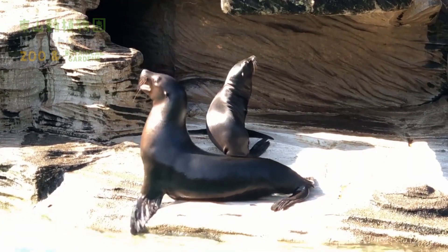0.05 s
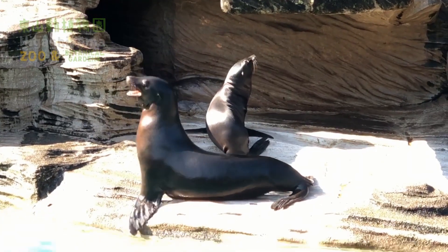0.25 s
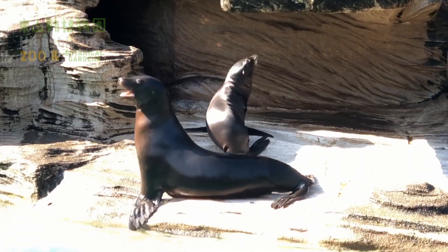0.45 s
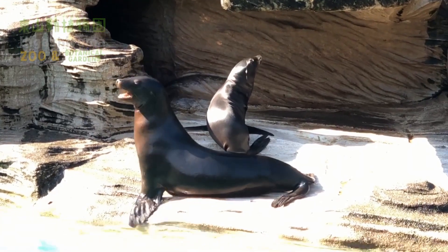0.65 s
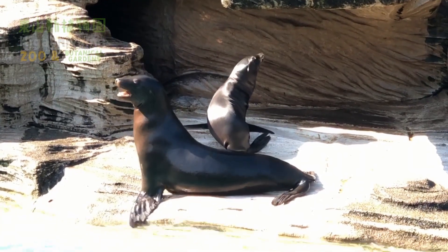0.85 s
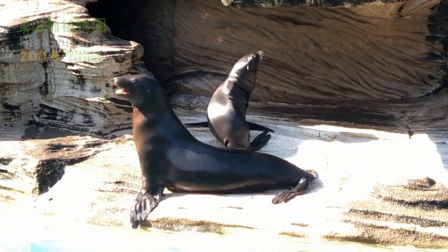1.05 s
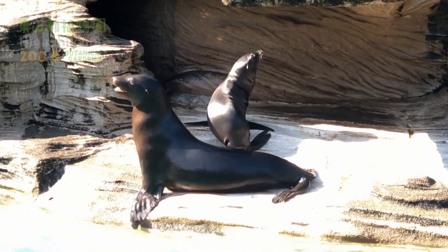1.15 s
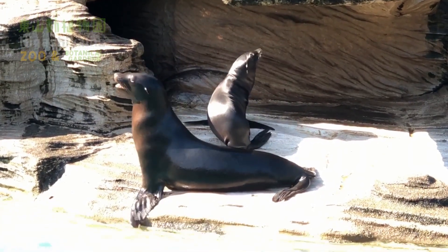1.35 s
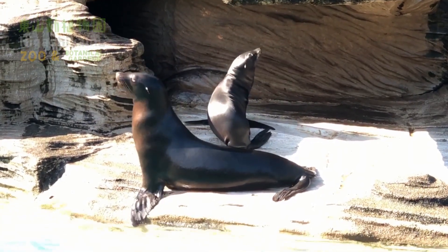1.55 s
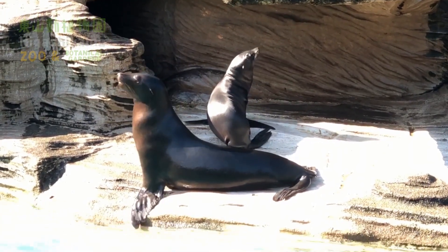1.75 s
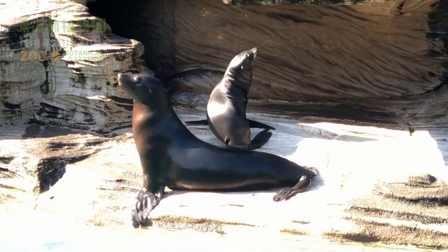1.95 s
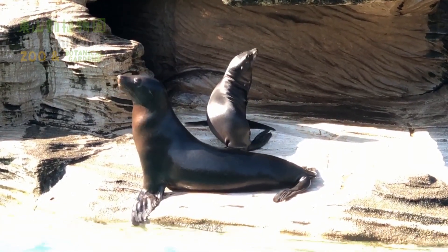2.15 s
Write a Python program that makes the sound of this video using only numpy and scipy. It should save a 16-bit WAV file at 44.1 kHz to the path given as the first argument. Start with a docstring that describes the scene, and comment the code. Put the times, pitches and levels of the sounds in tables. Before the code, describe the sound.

A sea lion gives four short honking barks, the later ones lower, weaker and hoarser, echoing briefly off rocks. Then pool water laps and plops faintly over a low rumble and soft hiss, heard from the water's edge.

```python
"""A sea lion barks on the rocks of its pool, almost centred before a stereo microphone at the water's edge.
We catch the end of one bark, then three more, each lower, weaker and hoarser. A bark is a honk from the
vocal folds (strong second and third harmonics) inside a rasp of air pulsed through the throat.
The rock wall behind rings on; water laps and plops over a low rumble and a soft hiss."""
import sys
import numpy as np
from scipy import signal
from scipy.fft import rfft, irfft
from scipy.io import wavfile
from scipy.ndimage import uniform_filter1d

SR = 44100
rng = np.random.default_rng(int(sys.argv[2]) if len(sys.argv) > 2 else 0)


def generate_wav(signal):
    """Clip the signal to [-1, 1] and save it as 16-bit WAV at the path in sys.argv[1]."""
    frames = np.transpose(np.atleast_2d(signal))
    scaled = np.clip(frames, -1, 1) * 32767
    pcm = np.round(scaled).astype(np.int16)
    wavfile.write(sys.argv[1], SR, pcm)


N = 97020
LEAD = SR // 5  # lead-in for the bark that is already sounding
T = np.arange(-LEAD, N) / SR
M = len(T)

# The course of each bark. Each row: time in seconds, pitch in Hz, then second harmonic,
# third harmonic, rasp and treble in relative dB.
FIRST_BARK = [(-.1, 445, -18, -50, -32, -44), (-.06, 500.4, -23, -40, -37, -52),
              (-.02, 495, -28, -43, -72, -44), (0.014, 499.5, -34.5, -58, -43.5, -49.5)]
SECOND_BARK = [(.228, 455, -57, -63, -45, -38.5), (.235, 449.8, -32.5, -58, -45, -35.5),
               (.245, 475, -22, -35, -23.5, -32.5), (0.252, 499.5, -44, -27.5, -32, -28),
               (0.264, 490.8, -27, -19.5, -29.5, -25), (0.289, 477.6, -17.5, -20, -33, -26),
               (0.326, 483.7, -19, -18.5, -44, -27.5), (0.346, 489.1, -17, -40, -32.5, -32.5),
               (0.357, 489.6, -25, -25, -39, -37), (0.366, 482.7, -58, -61, -30, -39)]
THIRD_BARK = [(0.644, 446.6, -43, -72, -36, -50), (0.65, 448.5, -40, -56, -40, -33.5),
              (.662, 471, -24, -32, -26.5, -30.5), (0.68, 450.2, -21, -39, -46.5, -36),
              (0.693, 446.9, -16, -30, -52, -34.5), (0.714, 445.5, -22.5, -35, -30, -36.5),
              (0.734, 464, -19.5, -44, -31, -37.5), (.746, 475.7, -28, -27, -40.5, -37),
              (0.757, 469.6, -24.5, -43, -36.5, -39.5), (.783, 459, -35.5, -65, -37, -48.5)]
LAST_BARK = [(1.081, 455.5, -55, -56, -46, -47), (1.096, 437.9, -24.5, -36, -41.5, -44),
             (1.107, 426, -24.5, -48, -35.5, -41), (1.121, 403.5, -35.5, -32.5, -39.5, -40.5),
             (1.148, 401.3, -36.5, -30, -34.5, -37.5), (1.162, 431.7, -18.5, -48, -46, -39.5),
             (1.179, 436.6, -24, -58, -34, -43.5), (1.189, 425.5, -73, -56, -36.5, -40),
             (1.198, 415, -25, -59, -41, -50), (1.21, 417.8, -36.5, -67, -42.5, -47)]
# The voice, bark by bark. Each row: jitter as a share of pitch, noisy share of the treble,
# fundamental offset in dB, rasp boost in dB, build-up of the top treble in seconds.
BARK_VOICES = [(0.0099, 0.44, -10, 9.5, .02), (0.0049, 0.47, -8, 3, 0.016), (0.0061, 0.66, -13, 3.5, 0.074),
               (0.0073, 1, -11, 6, 0.014)]
# Throat resonances. Each row: centre in Hz, width in Hz, gain in dB.
THROAT_RESONANCES = [(823, 78, 2.5), (919, 46, 5.5), (990, 180, -3), (1274, 160, -10), (1400, 72, -5.5),
                     (1600, 165, -15)]
# Treble colour as the mouth closes from bark to bark. Each row: frequency in Hz, gain in dB.
MOUTH_OPEN = [(1030, -58), (1750, -22), (1930, -9), (2080, -7), (2440, -13), (2550, -42), (2670, -16),
              (2770, -2.5), (2950, 1), (3110, -6.5), (3470, -11), (3590, -25), (3970, -8), (4830, -22.5),
              (5530, -18.5), (6620, -30), (7370, -22.5), (9480, -29.5), (11100, -29.5), (14600, -43),
              (15000, -61)]
MOUTH_HALF = [(1030, -41), (1750, -16), (1880, -22), (2040, 0.5), (2150, -1.5), (2270, -1.5), (2650, -13),
              (3110, 0), (3370, -10.5), (4220, -14), (4620, -22), (5430, -14), (5840, -17.5), (6220, -29),
              (6390, -20), (7990, -16.5), (9660, -21.5), (10900, -21), (15000, -40)]
MOUTH_NARROW = [(1030, -34), (1750, -2), (2060, -15), (2230, 2.5), (2310, 0.5), (2670, -9), (2770, -25),
                (3080, -3), (3560, -12.5), (3860, -11), (4880, -22), (5330, -12), (5580, -5.5), (6110, -25),
                (6680, -9), (7370, -26), (8440, -19), (9310, -24), (11100, -23.5), (12900, -36),
                (15000, -37)]
# Direct sound at the microphone. Each row: frequency in Hz, left minus right in dB.
MIC_BALANCE = [(500, -.2), (900, -.3), (1400, -.2), (2900, -1.5), (4500, -1), (8000, -.3)]
# Reflections off the rocks, nearest first. Each row: delay in seconds, gain in dB.
ROCK_ECHOES = [(.021, -21.5), (.043, -42), (.068, -17), (.125, -23), (.2, -28.5)]
# Ring of the enclosure. Each row: frequency in Hz, seconds to fall by 60 dB.
RING_DECAY = [(400, 1.08), (900, 1.14), (1500, 0.4), (3000, 2.4), (8000, 1.5), (15000, 5)]
# Colour of that ring. Each row: frequency in Hz, gain in dB.
RING_COLOUR = [(400, 8.5), (900, -1.5), (1500, -0.5), (3000, -3.5), (8000, 0.5), (15000, -2)]
# Plops in the pool. Each row: start in seconds, starting pitch in Hz, level in dB, length in seconds.
POOL_PLOPS = [(1.404, 430, -42.5, 0.013), (1.575, 271, -45, 0.074), (1.736, 563, -48.5, 0.026)]
# Small splashes. Each row: start in seconds, centre in Hz, level in dB, length in seconds.
POOL_SPLASHES = [(1.461, 1680, -48, 0.016), (1.483, 2770, -55.5, 0.02), (1.599, 620, -44.5, 0.014),
                 (1.604, 2250, -53, .016), (1.68, 3770, -57, 0.014), (1.937, 4700, -55.5, 0.05),
                 (2.046, 4760, -51.5, 0.033), (2.08, 1670, -42, 0.013), (2.161, 1600, -49.5, 0.011),
                 (2.157, 12000, -61.5, .05)]
# Strength of the lapping. Each row: time in seconds, level in dB.
LAPPING_LEVEL = [(0, -67), (.35, -50), (.55, -53.5), (1, -58), (1.38, -81), (1.48, -50.5), (1.8, -59),
                 (2, -67), (2.2, -70)]
# Background noise of the place. Each row: frequency in Hz, relative density in dB.
AMBIENCE_SPECTRUM = [(22, -22), (35, -20), (50, -6.5), (68, 4), (96, -7), (140, 0.5), (175, -4.5),
                     (290, -8), (360, -10), (560, -14.5), (800, -14), (1250, -18.5), (1750, -19),
                     (2300, -22), (5000, -23.5), (6400, -24), (8000, -31), (11000, -33.5), (15500, -38.5)]
# Swell of the background hiss. Each row: time in seconds, gain in dB.
HISS_SWELL = [(0, -2), (.2, -1), (.45, 4.5), (.65, 4.5), (1.05, 1.5), (1.35, -2), (1.6, -1), (2.2, 1.5)]


def sea_lion():
    """Four barks reach the microphone directly, then off the rocks, then as the ring of the wall."""
    courses = [FIRST_BARK, SECOND_BARK, THIRD_BARK, LAST_BARK]
    mouths = [(MOUTH_OPEN, 1), (MOUTH_OPEN, 1), (MOUTH_HALF, -1), (MOUTH_NARROW, -1)]
    barks = sum(bark(rows, voice, mouth, mouth_db)
                for rows, voice, (mouth, mouth_db) in zip(courses, BARK_VOICES, mouths))
    direct = np.array([shape(barks, MIC_BALANCE, share) for share in (.5, -.5)])
    echoes = sum(from_db(db) * np.interp(T - delay, T, barks, left=0) for delay, db in ROCK_ECHOES)
    return direct + echoes + wall_ring(barks)


def bark(rows, voice, mouth, mouth_db, attack_s=.0021, release_s=.029, closing_db_per_s=62):
    """Jittering vocal folds drive the honk, the rasp and the treble in step."""
    jitter, noisy, fundamental_offset_db, boost_db, build_s = voice
    times, *columns = np.transpose(rows)
    pitch, second_db, third_db, rasp_db, treble_db = [np.interp(T, times, c) for c in columns]
    start, end = times[0], times[-1]
    gate = np.exp(-np.maximum(start - T, 0) / attack_s - np.maximum(T - end, 0) / release_s)
    phase = 2 * np.pi * np.cumsum(pitch * (1 + jitter * drift(rate_hz=108))) / SR
    # The mouth closes through a bark and the low tone grows.
    closing_db = closing_db_per_s * (np.clip(T, start, end) - times.mean())
    fundamental_db = (second_db + rasp_db) / 2 + fundamental_offset_db + closing_db
    tone = honk(phase, [fundamental_db, second_db, third_db], jitter)
    rasp = from_db(rasp_db + boost_db) * throat_rasp(phase)
    treble = from_db(treble_db + mouth_db) * mouth_treble(phase, pitch, mouth, noisy, start, build_s)
    return gate * (tone + rasp + treble)


def honk(phase, levels_db, jitter, flutter_db_per_jitter=171):
    """The lowest harmonics of the folds, each fluttering in level on its own."""
    flutter_db = flutter_db_per_jitter * jitter
    return np.sqrt(2) * sum(from_db(db + flutter_db * drift(rate_hz=65)) * np.sin(k * phase)
                            for k, db in enumerate(levels_db, 1))


def throat_rasp(phase, band_hz=(670, 1900)):
    """Puffs of air ring the low resonances of the throat."""
    air = puffs(phase, depth=.89)
    rasp = sum((-1) ** k * from_db(db) * resonate(air, hz, width)
               for k, (hz, width, db) in enumerate(THROAT_RESONANCES))
    return even(bandpass(rasp, band_hz, order=6))


def mouth_treble(phase, pitch, mouth, noisy, start, build_s, flutter_db=1.17):
    """The mouth colours upper harmonics and pulsed breath; the very top builds up last."""
    overtones = sum(from_db(at_hz(mouth, k * pitch)) * np.cos(k * phase + 2 * np.pi * rng.random())
                    for k in range(4, 18))
    breath = shape(puffs(phase, depth=.61), mouth)
    treble = np.sqrt(1 - noisy) * rms_one(overtones) + np.sqrt(noisy) * rms_one(breath)
    held_back = highpass(treble, hz=3200) * np.clip(1 - (T - start) / build_s, 0, 1)
    return (treble - held_back) * from_db(flutter_db * drift(rate_hz=134))


def puffs(phase, depth):
    """Air noise let through once in each cycle of the folds."""
    return rng.standard_normal(M) * (1 + depth * np.cos(phase)) ** 2


def wall_ring(x, gain_db=-19, delay_s=.012):
    """Sound scattered by the rock wall behind the animal; each band dies at its own rate."""
    edges = np.geomspace(200, 16000, 11)
    age = np.arange(SR) / SR
    tail = np.zeros(SR)
    for low, high in zip(edges, edges[1:]):
        band = bandpass(rng.standard_normal(SR), [low, high], order=2)
        hz = np.sqrt(low * high)
        tail += band * from_db(at_hz(RING_COLOUR, hz) - 60 * age / at_hz(RING_DECAY, hz))
    tail *= np.clip(age / delay_s - 1, 0, 1)
    return from_db(gain_db) * signal.fftconvolve(x, tail / np.linalg.norm(tail))[:M]


def plops(rise_octaves=.178):
    """Water plops in the pool: short tones that rise in pitch."""
    out = np.zeros(M)
    for start, hz, db, length in POOL_PLOPS:
        pitch = hz * 2 ** (rise_octaves * np.clip((T - start) / length, 0, 1))
        out += from_db(db) * swell(start, length) * np.sin(2 * np.pi * np.cumsum(pitch) / SR)
    return out


def splashes(width_share=.21):
    """Small splashes on the surface: each a burst of narrow-band noise."""
    out = np.zeros(M)
    for start, hz, db, length in POOL_SPLASHES:
        spray = even(resonate(rng.standard_normal(M), hz, width_share * hz))
        out += from_db(db) * swell(start, length) * spray
    return out


def lapping(drops_per_s=400, spread_db=3):
    """Water laps in a fine patter of drops, each ringing at one of twenty pitches."""
    hits = rng.random(M) < drops_per_s / SR
    strength = from_db(spread_db * np.minimum(rng.exponential(1, M), 4))
    drops = hits * strength * rng.choice([-1, 1], M)
    pitches = np.geomspace(700, 6000, 20)
    pitch_index = rng.integers(0, len(pitches), M)
    patter = sum(resonate(drops * (pitch_index == k), hz, hz / 10) / hz for k, hz in enumerate(pitches))
    return gain_curve(LAPPING_LEVEL) * rms_one(patter)


def ambience(base_db=-47.5):
    """The bed of the place: low rumble under a slowly swelling hiss."""
    noise = from_db(base_db) * rms_one(shape(rng.standard_normal(M), AMBIENCE_SPECTRUM))
    hiss = highpass(noise, hz=4700)
    return noise - hiss + hiss * gain_curve(HISS_SWELL)


def drone(hz, db, width_hz=8.2):
    """A faint low tone in the background, wavering in level and phase."""
    phase = 2 * np.pi * hz * T
    return from_db(db) * (drift(width_hz) * np.sin(phase) + drift(width_hz) * np.cos(phase))


def from_db(db):
    """Decibels to gain."""
    return 10 ** (np.asarray(db) / 20)


def rms_one(x):
    """Scale to unit rms."""
    return x / np.sqrt(np.mean(x ** 2) + 1e-20)


def gain_curve(points):
    """Gain over time from rows of seconds and dB."""
    return from_db(np.interp(T, *np.transpose(points)))


def at_hz(points, hz):
    """Read a table on a log-frequency axis."""
    f, value = np.transpose(points)
    return np.interp(np.log(np.maximum(hz, 1)), np.log(f), value)


def shape(x, spectrum, share=1):
    """Filter by rows of Hz and dB, or by a share of those dB."""
    return irfft(rfft(x) * from_db(share * at_hz(spectrum, np.fft.rfftfreq(M, 1 / SR))), M)


def bandpass(x, band_hz, order):
    """Keep the band between two edges."""
    return signal.sosfilt(signal.butter(order, band_hz, "band", fs=SR, output="sos"), x)


def highpass(x, hz):
    """Keep the top without phase shift, so it subtracts cleanly."""
    return signal.sosfiltfilt(signal.butter(2, hz, "high", fs=SR, output="sos"), x)


def resonate(x, hz, width_hz):
    """One resonance with gain 1 at its peak."""
    r = np.exp(-np.pi * width_hz / SR)
    feedback = [1, -2 * r * np.cos(2 * np.pi * hz / SR), r * r]
    return signal.lfilter(np.array([1, 0, -1]) * (1 - r * r) / 2, feedback, x + 1e-18)


def drift(rate_hz):
    """Smooth random wander with unit rms."""
    r = np.exp(-2 * np.pi * rate_hz / SR)
    return rms_one(signal.lfilter([1], [1, -2 * r, r * r], rng.standard_normal(2 * M))[M:])


def even(x, size=700):
    """Hold a noise at unit level."""
    return x / np.sqrt(uniform_filter1d(x * x, size) + 1e-9)


def swell(start, length):
    """A quick rise and a dying fall, height 1."""
    age = 2 * np.maximum(T - start, 0) / length
    return age ** 2 * np.exp(2 * (1 - age))


def scene():
    """From the water's edge: the sea lion in front, the pool and the background well below it."""
    mix = sea_lion() + plops() + splashes() + lapping() + ambience()
    mix += drone(hz=70, db=-59.5) + drone(hz=140, db=-62.5)
    return mix[:, LEAD:]


def record(dry):
    """The microphone signal is cut steeply above 15750 Hz."""
    return signal.sosfilt(signal.ellip(12, .1, 90, 15750, fs=SR, output="sos"), dry)


dry = scene()
out = record(dry)
generate_wav(out)
```